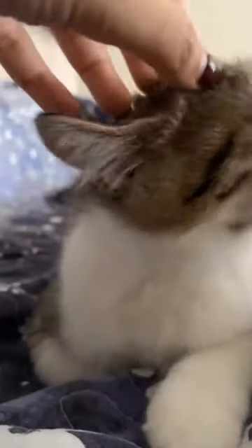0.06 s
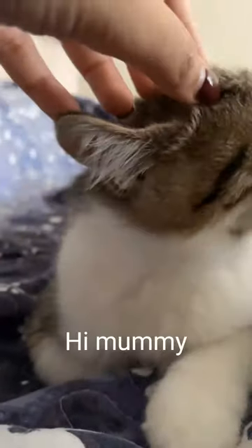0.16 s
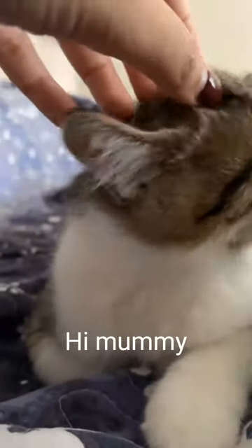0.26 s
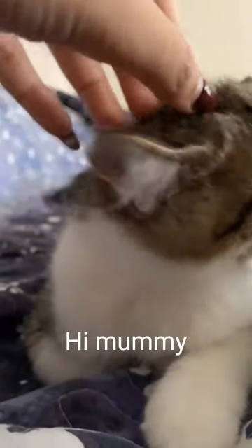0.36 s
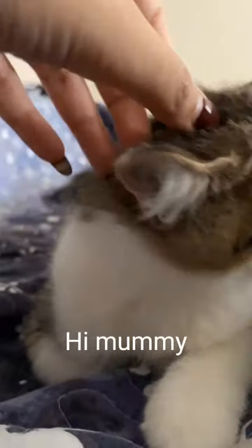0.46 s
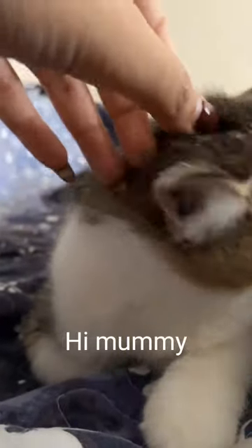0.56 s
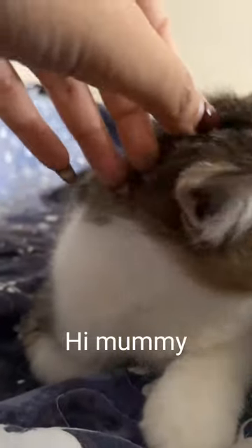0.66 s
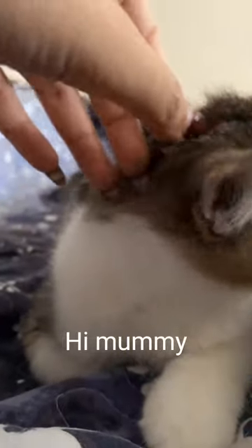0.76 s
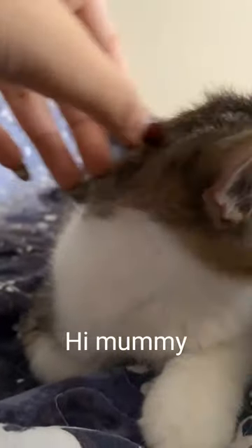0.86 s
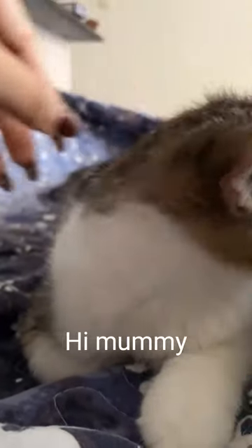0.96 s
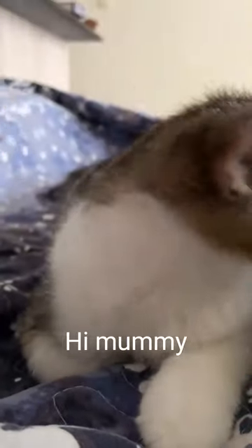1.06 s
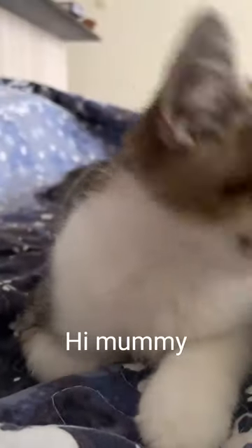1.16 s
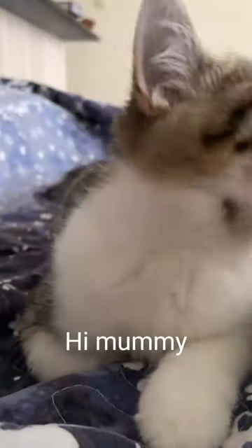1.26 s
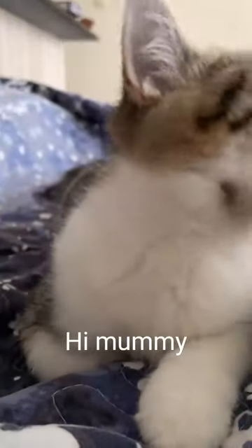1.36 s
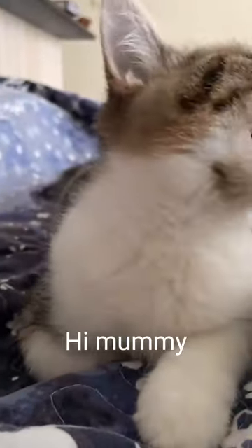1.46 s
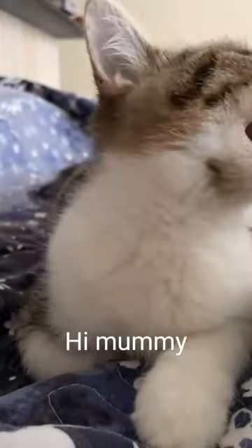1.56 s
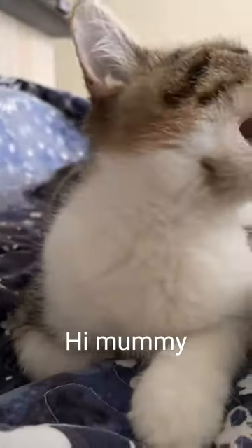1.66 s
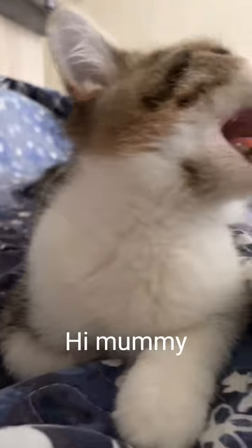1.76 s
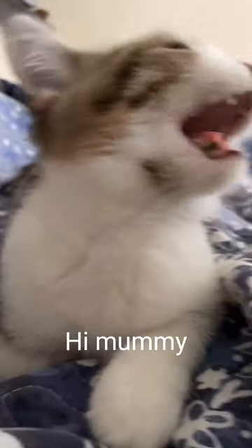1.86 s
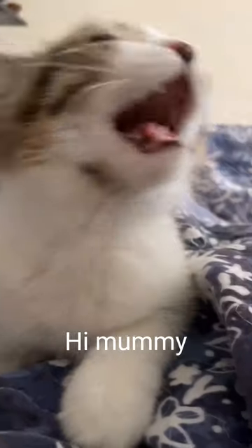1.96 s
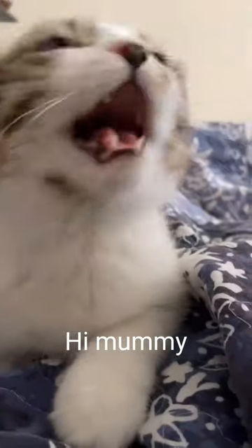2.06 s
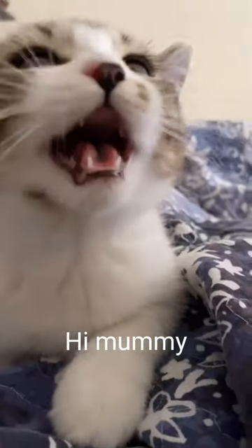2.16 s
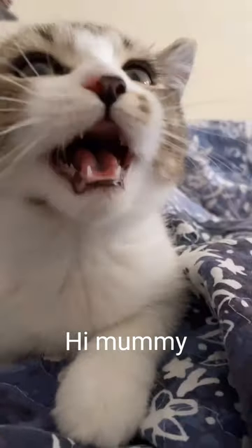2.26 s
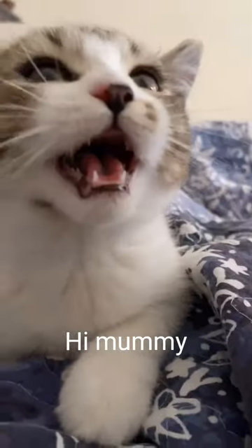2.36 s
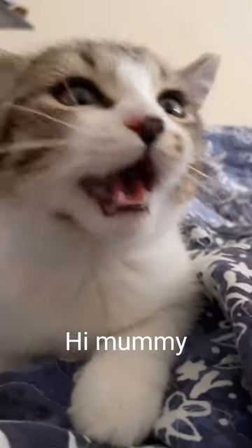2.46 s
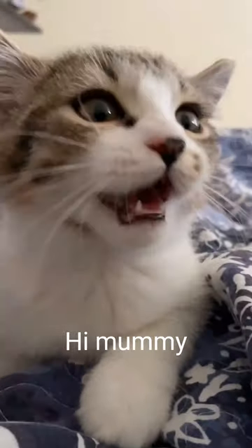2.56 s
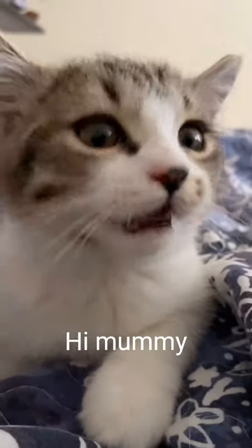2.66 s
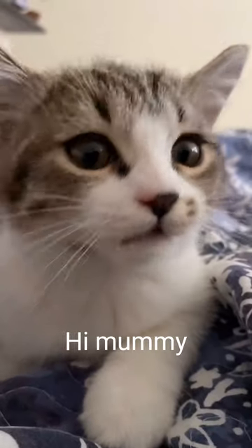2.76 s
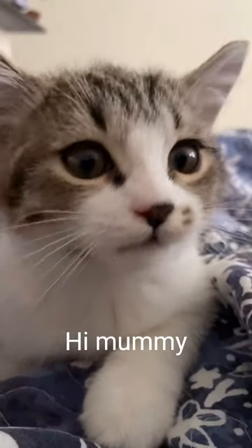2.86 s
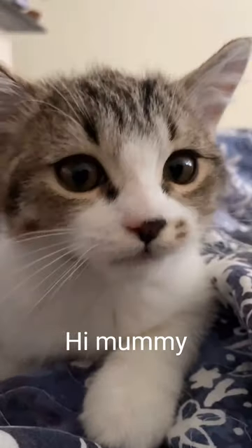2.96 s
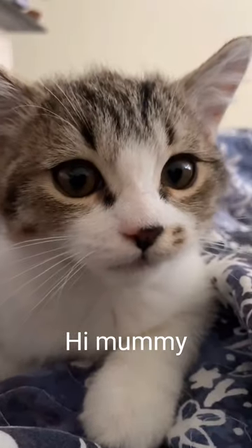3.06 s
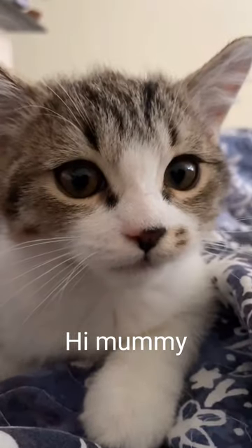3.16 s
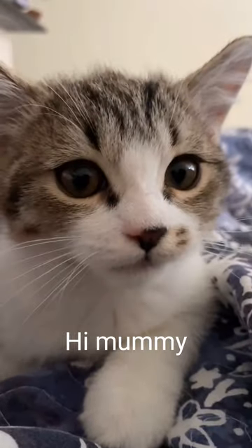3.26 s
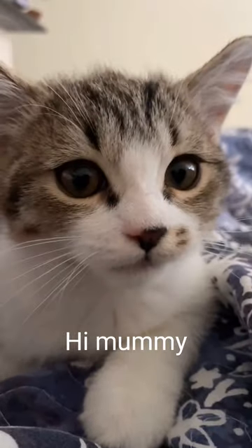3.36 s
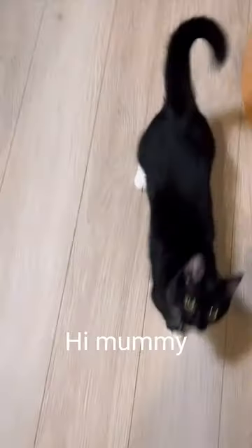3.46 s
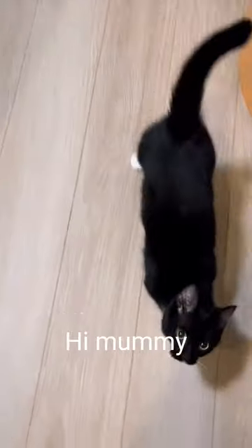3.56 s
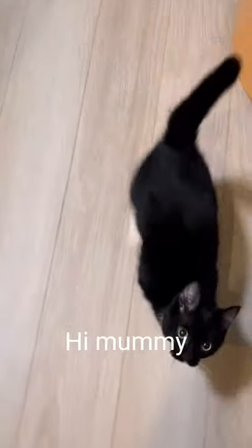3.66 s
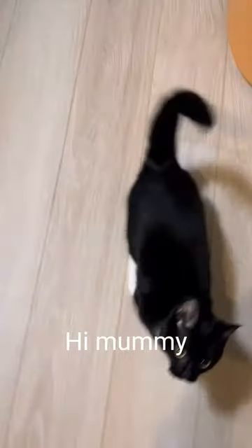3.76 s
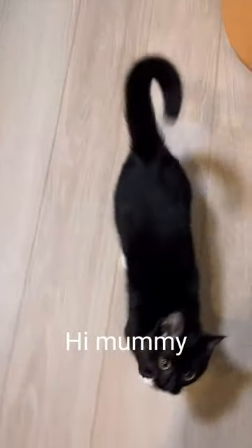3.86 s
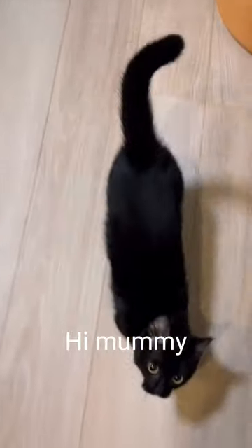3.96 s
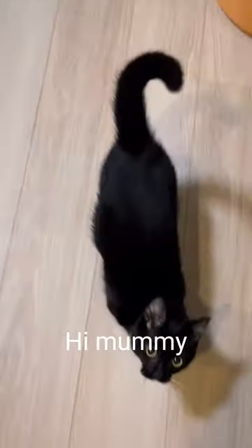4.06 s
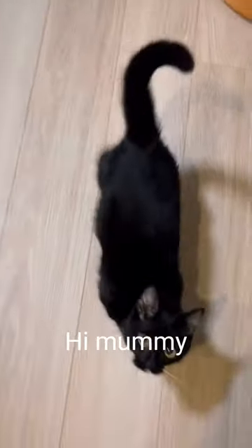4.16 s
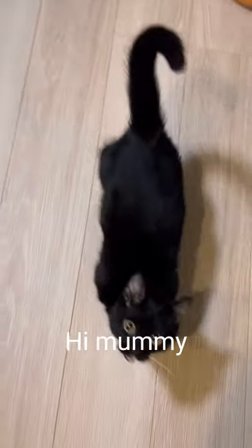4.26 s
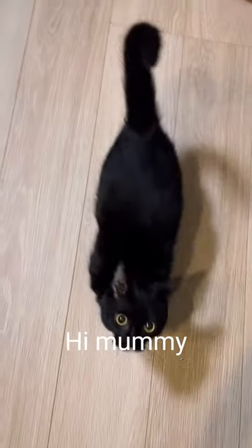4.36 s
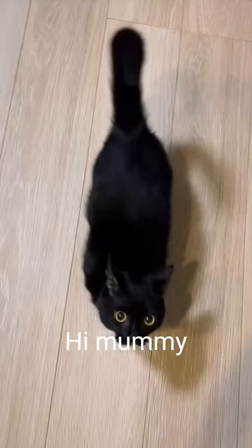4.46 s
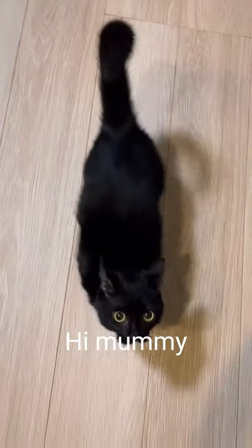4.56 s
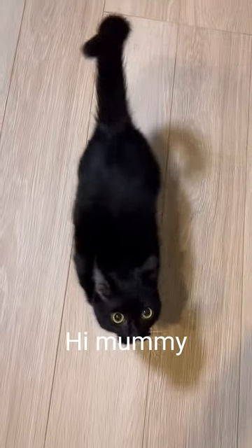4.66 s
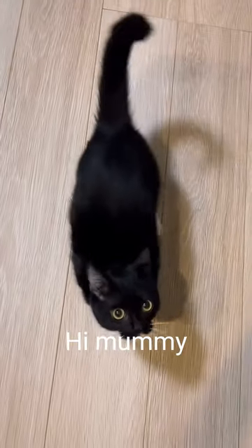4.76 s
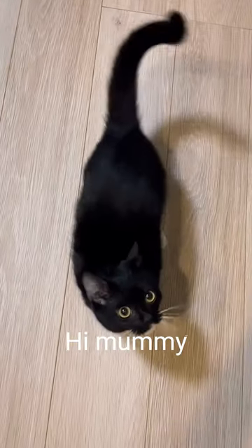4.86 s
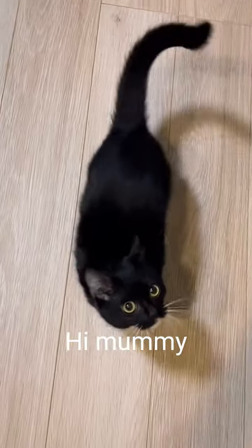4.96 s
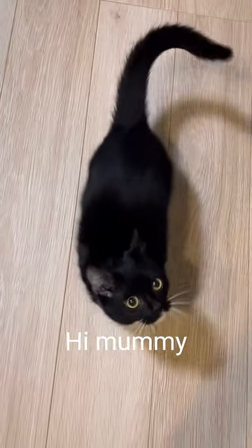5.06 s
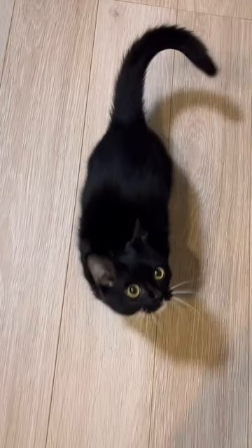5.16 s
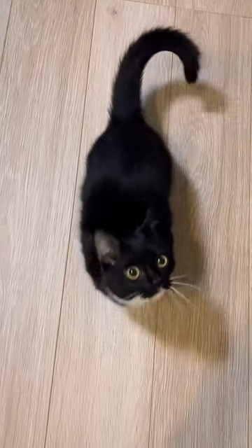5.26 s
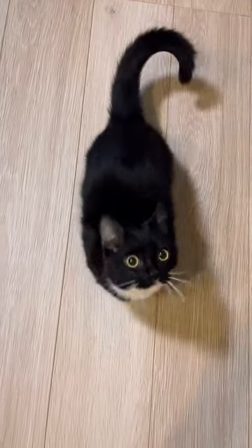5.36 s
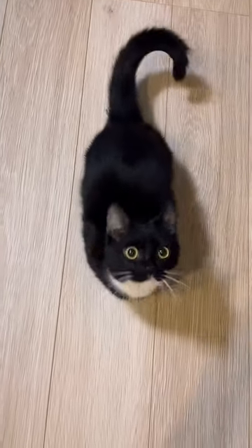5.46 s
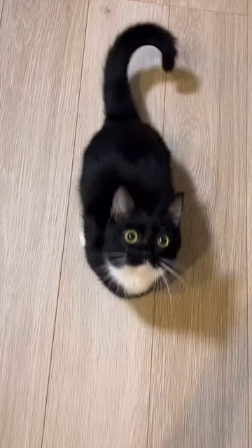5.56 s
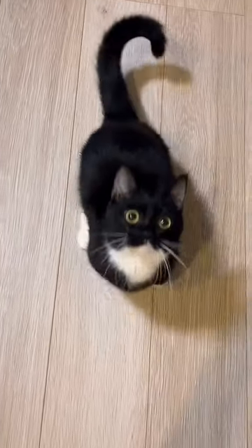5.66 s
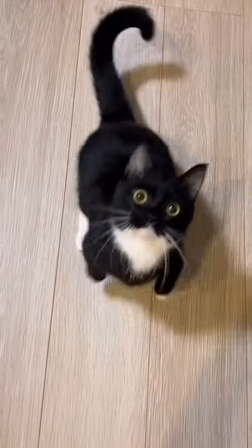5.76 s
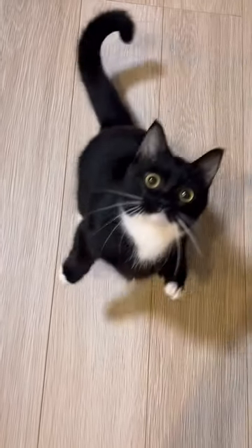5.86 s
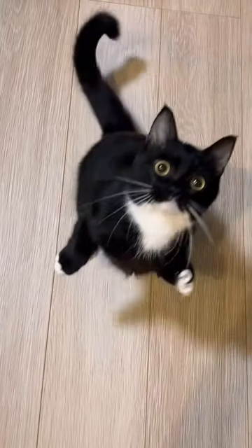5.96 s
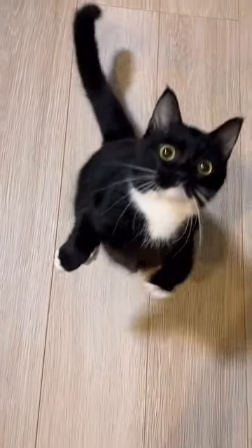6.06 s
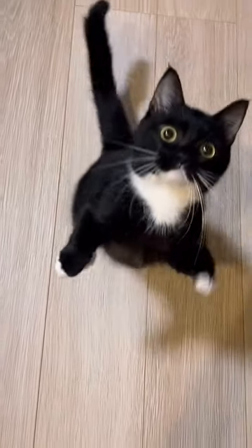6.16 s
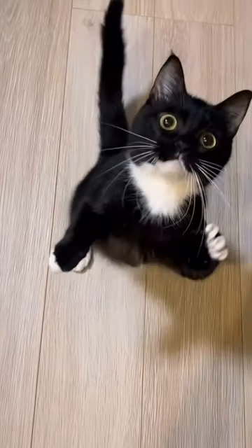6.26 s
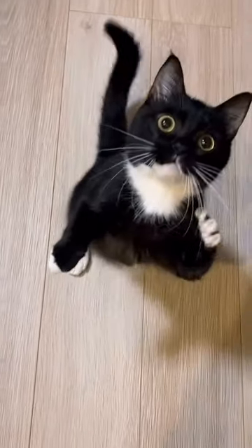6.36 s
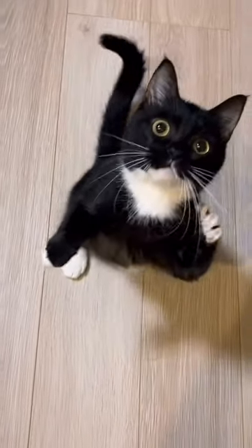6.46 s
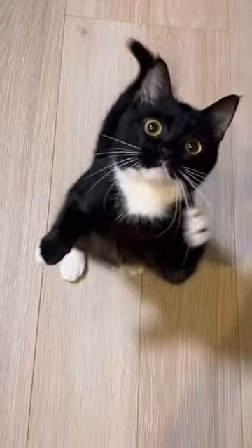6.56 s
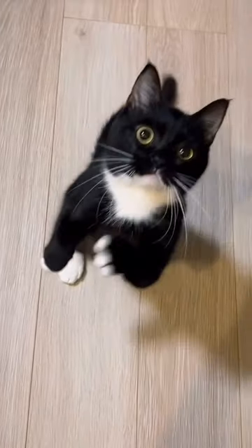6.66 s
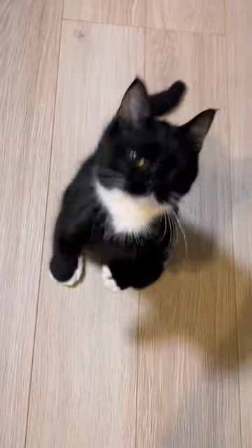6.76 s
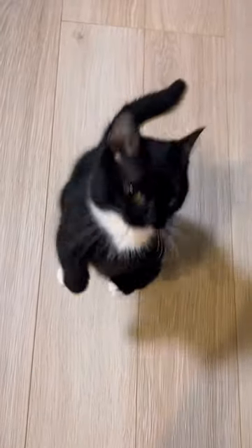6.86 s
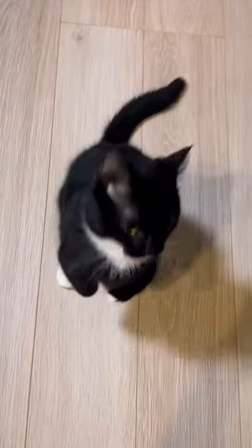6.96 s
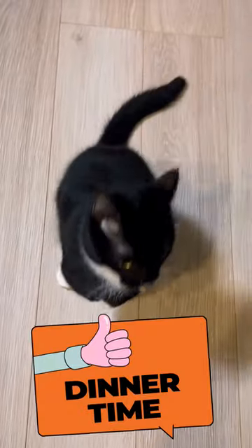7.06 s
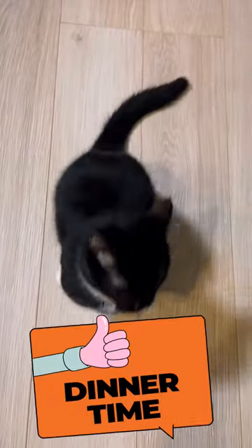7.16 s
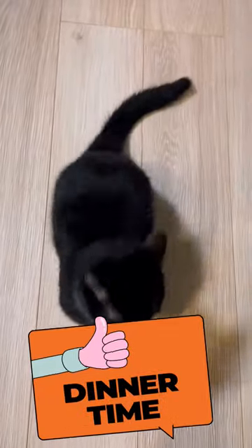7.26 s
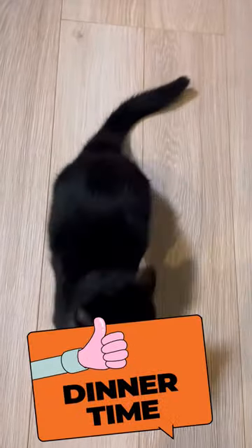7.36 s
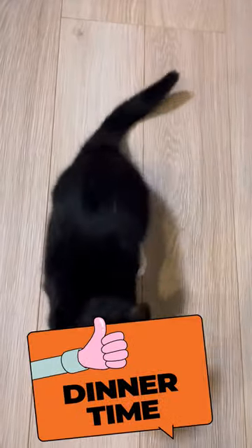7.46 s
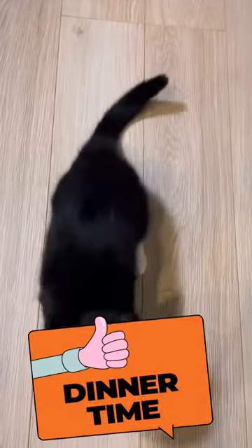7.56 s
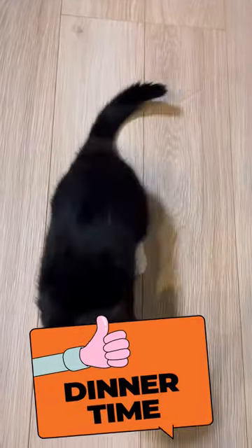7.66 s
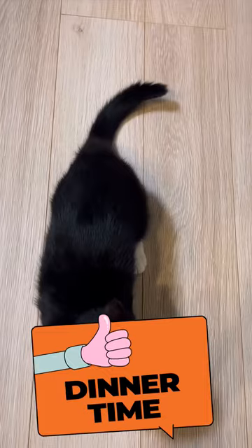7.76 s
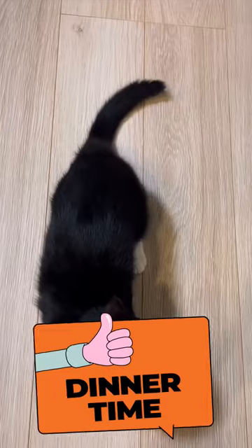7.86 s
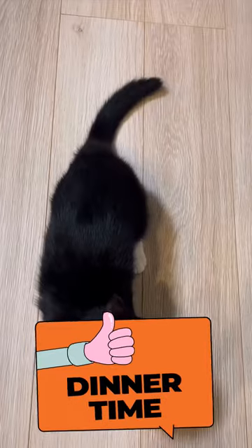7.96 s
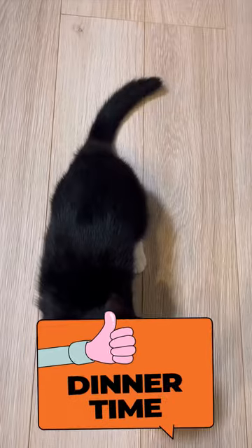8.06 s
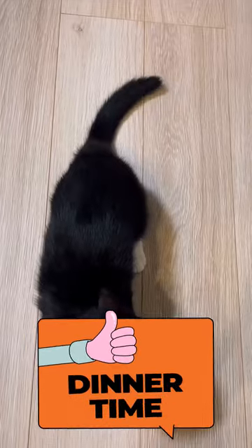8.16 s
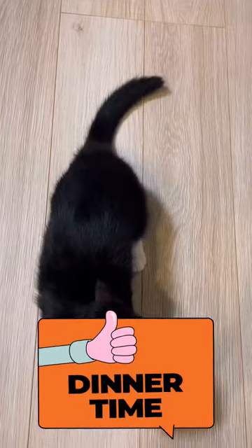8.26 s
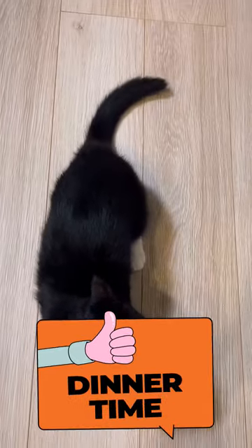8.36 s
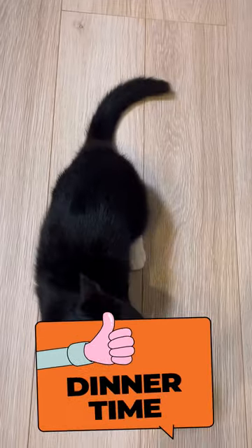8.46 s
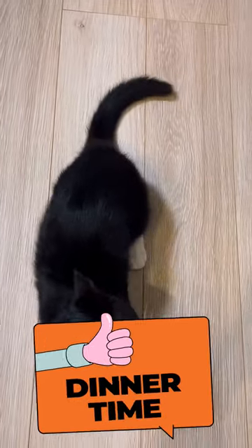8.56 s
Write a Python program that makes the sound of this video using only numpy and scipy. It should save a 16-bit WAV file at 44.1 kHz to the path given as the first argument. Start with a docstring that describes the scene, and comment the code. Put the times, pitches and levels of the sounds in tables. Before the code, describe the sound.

A kitten gives one long, loud meow close by over an appliance rumble, then a cat meows softly twice in a quieter room.

```python
"""A kitten and a cat in two homes

A kitten on a bed gives one long, loud meow close to a phone with two microphones, turning its head,
over the rumble of an appliance. After a short silence a cat on a wooden floor gives two soft meows
further off, among footfalls, cloth rustle and small ticks in a quieter room. In each meow the vocal
folds buzz, and the moving mouth boosts some of the harmonics (tones at multiples of the pitch)."""
import sys
import numpy as np
from scipy import signal
from scipy.fft import rfft, irfft
from scipy.io import wavfile
from scipy.ndimage import uniform_filter1d

SR = 44100
rng = np.random.default_rng(int(sys.argv[2]) if len(sys.argv) > 2 else 0)


def pcm_store(signal):
    """Save signal as 16-bit PCM."""
    levels = np.round(np.clip(np.atleast_2d(signal), -1, 1) * 32767)
    wavfile.write(sys.argv[1], SR, levels.astype(np.int16).T)


N = 379684
T = np.arange(N) / SR
PAIR = np.array([[1], [-1]])  # plus on the left, minus on the right
TOP_HZ = 15600

# The course of the kitten's meow: (time [s], pitch [Hz], level [dB], lower mouth resonance [Hz],
# upper mouth resonance [Hz], roughness [0-1], high throat ring [dB])
KITTEN_MEOW = [(1.205, 545, -37, 1790, 3600, .6, -67), (1.237, 664, -24.5, 1970, 3800, .42, -45),
               (1.26, 780, -20, 2410, 3900, .36, -42), (1.295, 859, -19.5, 1370, 4350, .3, -40),
               (1.335, 912, -18, 1530, 4540, .12, -56), (1.397, 948, -17.5, 1510, 4800, .03, -64),
               (1.42, 929, -18, 1504, 4440, .03, -67.5), (1.46, 912, -18.5, 1475, 4350, .035, -75),
               (1.55, 923.6, -16.5, 1508, 4260, 0.061, -55.5), (1.7, 916, -15.5, 1580, 3850, 0.034, -56.5),
               (1.85, 908, -17.5, 1680, 3580, 0.029, -62), (1.95, 896, -17, 1633, 3640, 0.045, -43.5),
               (2.1, 875.6, -16, 1770, 3720, 0.032, -38), (2.25, 865.3, -18, 1717, 3800, 0.025, -35),
               (2.46, 847.6, -18, 1603, 3556, 0.047, -35), (2.53, 825, -20, 1554, 3770, .1, -38),
               (2.555, 819, -20, 1457, 3760, 0.13, -40.5), (2.564, 689, -32, 1348, 2300, 1, -34),
               (2.576, 605, -25.5, 805, 2200, 0.7, -31.5), (2.592, 600, -25.5, 900, 2200, 0.7, -60)]
# How far the kitten's sound at the left microphone runs ahead: (frequency [Hz], lead [rad])
LEFT_LEAD = [(5000, 0.21), (6300, 2.2), (9000, 4.46), (11000, 4.9), (13000, 10), (15500, 11.2)]
# The shape of the kitten's mouth and throat; voice() names each number
KITTEN_SHAPE = dict(mouth=(-8.5, -11, 400.5, 398.5, -2.5, 1.5), throat=(2730, 620, 0.42),
                    late_db=18.5, fade=(1.6, .13, -12))


def kitten():
    """One long meow; as the head turns, each low harmonic shifts between the microphones."""
    # Head turn: (time [s], pose [0 turned away, 1 facing the phone, 2 turned past it])
    head_turn = [(1.2, 0.029), (1.75, 0.57), (1.9, 0.62), (2.03, 0.91), (2.25, 1.31), (2.46, 1.6),
                 (2.6, 1.58)]
    # Left level minus right, a row for each of harmonics 1-5: (pose 0 [dB], pose 1 [dB], pose 2 [dB])
    balance = [(14, -2, 6.5), (-3.5, 9, 4.5), (20.5, -10.5, 4.5), (3.5, -1.5, -1), (0.5, -2.5, 0)]
    # Lead of the left side, same rows: (pose 0 [rad], pose 1 [rad], pose 2 [rad])
    leads = [(-1.4, -1.04, 2.5), (2.5, -1.4, 0.83), (4.5, 3.5, 4.9), (0.64, 1.77, 3.42), (0.2, 1, 3.2)]
    # High harmonics: (frequency [Hz], level against the first three together [dB])
    treble = [(4000, -27.5), (5500, -52.5), (6400, -45.5), (7300, -33), (8500, -35.5), (10500, -47.5),
              (12500, -48.5), (15500, -44)]

    def top_gain(hz, db, t):
        *_, upper_hz, rough, ring_db = columns(KITTEN_MEOW, t)
        mouth = undb(db[4] - 4.5) * resonance(hz, upper_hz + 500, width_hz=1900)
        ring = undb(ring_db) * resonance(hz, centre_hz=8870, width_hz=960)
        buzz = sum(undb(db[:3])) * undb(columns(treble, hz)[0])
        return (1 - rough) * (mouth + ring + buzz)  # a rough voice loses its high harmonics

    def paths(k, hz, t):
        if k > 5:
            return 0, columns(LEFT_LEAD, hz)[0]
        pose = columns(head_turn, t)[0]
        # puffs of air rock the lowest harmonic from side to side
        rocking_db = (k == 1) * 7 * np.clip((puffs_db(t) + 64) / 12, 0, 1) * wander(90, len(t))
        pan_db = np.interp(pose, range(3), balance[k - 1]) + rocking_db
        return pan_db, np.interp(pose, range(3), leads[k - 1])

    return meow(KITTEN_MEOW, KITTEN_SHAPE, top_gain, paths, jitter=.0018, flicker_db=3, rasp_db=-40,
                flutter_db=lambda k, rough: min(.5 * (k - 1), 2.2))


def kitten_breath():
    """Air rushes past the vocal folds, grows where the voice is rough and rings in the throat."""
    # Tone of the rushing air and of the throat ring: (frequency [Hz], level [dB])
    rushing = [(300, -4.5), (600, -9.5), (1300, -18), (2300, 8), (3200, -27.5), (4500, -4), (7000, -16.5),
               (15500, -24)]
    ringing = [(6000, -32.5), (8000, 2), (9000, -1.5), (10500, -16), (14000, -9), (15500, -10.5)]

    def stereo_noise(tone):
        spectrum, hz = noise_spectrum(tone)
        return irfft(spectrum * np.exp(.5j * PAIR * columns(LEFT_LEAD, hz)[0]), N)

    start, end = KITTEN_MEOW[0][0], KITTEN_MEOW[-1][0]
    _, rough, db = voice(KITTEN_MEOW, np.maximum(T, start), **KITTEN_SHAPE)
    envelope = np.clip((T - start) / 0.013, 0, 1) * np.exp(-np.maximum(T - end, 0) / 0.018)
    effort = sum(undb(db[:3])) * (undb(-39.5) + undb(-7.5) * rough ** 2)
    ring_gain = undb(columns(KITTEN_MEOW, T)[5] - 21.5)
    air = effort * stereo_noise(rushing) + ring_gain * stereo_noise(ringing)
    return envelope * undb(3 * wander(40)) * air


def kitten_pops():
    """The meow breaks off in lone pops of the vocal folds, which ring the closing mouth."""
    # Pops: (time [s], level [dB], upper resonance against the lower [dB])
    pops = [(2.579, -17, -7), (2.593, -24, -14)]
    low_hz, high_hz, rise_s, decay_s = 620, 1260, 0.0029, 0.0053
    out, t = np.zeros((2, N)), T[:SR // 20]
    envelope = 2 * (1 - np.exp(-t / rise_s)) * np.exp(-t / decay_s)
    for time, db, upper_db in pops:
        start = int(time * SR)
        ring = np.sin(2 * np.pi * low_hz * t) + undb(upper_db) * np.sin(2 * np.pi * high_hz * t)
        out[:, start:start + len(t)] += undb(db + PAIR) * ring * envelope
    return out


def cat():
    """Two soft meows; floor and walls return a short echo, different at each microphone."""
    # One list a meow: (time [s], pitch [Hz], level [dB], lower mouth resonance [Hz],
    # upper mouth resonance [Hz], roughness [0-1])
    calls = [
        [(3.88, 408.8, -63, 900, 1300, 0.45), (4, 413.2, -53.5, 556, 1440, 0.41),
         (4.05, 507, -57, 696, 1600, 0.34), (4.12, 598, -63.5, 1340, 2250, .3),
         (4.16, 640, -50.5, 1650, 2730, 0.36), (4.2, 676.6, -41.5, 1800, 3030, 0.19),
         (4.235, 711, -41.5, 1940, 3260, 0.087), (4.27, 708, -38.5, 1870, 3200, 0.14),
         (4.31, 687, -45, 1910, 2680, 0.085), (4.35, 659, -49.5, 1600, 1980, 0.21),
         (4.41, 584, -53.5, 1400, 1880, 0.34)],
        [(6.07, 520, -49, 422, 420, 0.17), (6.13, 632, -61, 620, 620, 0.28), (6.17, 780, -59, 1540, 1550, 0.21),
         (6.21, 721, -66, 1460, 1620, 0.21), (6.27, 698, -58, 1620, 2730, 0.077),
         (6.32, 704.4, -50, 1410, 2760, 0.057), (6.38, 708.7, -49, 1420, 2720, 0.049),
         (6.46, 688, -50.5, 1400, 2280, 0.072), (6.52, 682, -58, 1616, 2040, .12),
         (6.61, 669, -71, 1400, 1700, 0.35)],
    ]
    # High rings of the voice: (frequency [Hz], width [Hz], base level against harmonic 2 [dB])
    rings = [(4737, 250, -6), (6350, 880, -30.5)]
    shape = dict(mouth=(0, -38, 918, 795, -9.5, 2), throat=(650, 370, -22),
                 late_db=0, fade=(6.4, .6, -14))

    def top_gain(hz, db, t):
        second_meow = t[0] > calls[0][-1][0]
        weak_db = np.minimum(db[1] + 57, 0)  # the rings need full voice and an open mouth
        dip_db = -10 * (np.abs(t - calls[1][1][0]) < .1)  # early in the second meow
        level_db = db[1] + weak_db + dip_db + (-6 if second_meow else -5)
        return sum(undb(level_db + ring_db) * resonance(hz, centre, width) ** 2
                   for centre, width, ring_db in rings)

    def paths(k, hz, t):
        return .5, hz / 4000

    direct = sum(meow(call, shape, top_gain, paths, jitter=0.004, flicker_db=6.5, rasp_db=-29,
                      flutter_db=lambda k, rough: 1.5 + 6 * rough) for call in calls)
    t = T[:SR // 4]
    echo = rng.standard_normal((2, len(t))) * np.exp(-t / 0.038) * (t > .005)
    return direct + undb(-34) * signal.fftconvolve(direct, echo, axes=1)[:, :N]


def meow(call, shape, top_gain, paths, jitter, flicker_db, rasp_db, flutter_db):
    """Vocal folds buzz on a gliding pitch; each harmonic takes its own path to the microphones."""
    start, end = int(call[0][0] * SR), int(call[-1][0] * SR)
    t, n = T[start:end], end - start
    pitch, rough, db = voice(call, t, **shape)
    wobble = jitter * wander(90, n) + .002 * wander(30, n) + 0.036 * rough ** 2 * wander(400, n)
    phase = 2 * np.pi * np.cumsum(pitch * (1 + wobble)) / SR
    out = np.zeros((2, N))
    for k in range(1, 19):
        hz = k * pitch
        if k <= 5:
            gain = undb(db[k - 1] + 0.35 * k * wander(35, n))
        else:
            gain = top_gain(hz, db, t) * undb(flicker_db * wander(15, n))
        # uneven cycles shake the higher harmonics more
        shake = 1 - rough ** 2 + rough * wander(800, n) + k * undb(rasp_db) * wander(500, n)
        gain = gain * shake * undb(flutter_db(k, rough) * wander(110, n))
        pan_db, lead = paths(k, hz, t)
        pan = undb(pan_db) * np.ones(n)
        sides = np.array([pan, np.ones(n)]) * 2 / np.sqrt(1 + pan ** 2)
        # all harmonics dip together once a cycle as the folds snap shut
        out[:, start:end] -= gain * sides * np.cos(k * phase + PAIR * lead / 2) * (hz < TOP_HZ)
    out[:, start:end] *= np.clip(np.minimum(t - t[0], (t[-1] - t) / 3) / 0.0044, 0, 1)
    return out


def voice(call, t, mouth, throat, late_db, fade):
    """Pitch, roughness and levels of harmonics 1-5, shaped by a moving mouth and a steady throat."""
    slope_db_per_octave, floor_db, low_width_hz, high_width_hz, high_db, steepness = mouth
    throat_hz, throat_width_hz, throat_db = throat
    fade_time, fade_s, fade_db = fade
    pitch, level_db, low_hz, high_hz, rough = columns(call, t)[:5]
    pitch = uniform_filter1d(pitch, size=SR // 110)  # the folds round every turn of the pitch
    hz = np.arange(1, 6)[:, None] * pitch
    # the lowest harmonic and the throat resonance start late_db and half that weaker, then catch up
    weak_db = late_db * np.clip(1 - (t - call[0][0]) / 0.096, 0, 1) ** .5
    boost = (undb(floor_db) + resonance(hz, low_hz, low_width_hz) ** steepness
             + undb(high_db) * resonance(hz, high_hz, high_width_hz) ** steepness
             + undb(throat_db - weak_db / 2) * resonance(hz, throat_hz, throat_width_hz))
    db = level_db + slope_db_per_octave * np.log2(hz / 1000) + 20 * np.log10(boost)
    db[0] -= weak_db
    db[4] += fade_db * np.exp(-.5 * (2 * (t - fade_time) / fade_s) ** 2)  # harmonic 5 fades for a while
    return pitch, np.clip(rough, 0, 1), db


def thumps():
    """Low knocks travel through hand and floor and die away quickly."""
    # Knocks: (time [s], level [dB], frequency [Hz])
    knocks = [(1.024, -16, 80), (1.175, -23.5, 79), (1.211, -22, 64), (2.727, -21, 60), (2.848, -19, 57.6),
              (3.455, -31.5, 170.7), (3.682, -32.5, 99), (3.747, -23, 97), (3.873, -34.5, 155),
              (4.041, -34, 109), (4.114, -41.5, 112)]
    out, t = np.zeros(N), T[:SR // 4]
    envelope = 0.97 * (1 - np.exp(-t / 0.00096)) * np.exp(-t / 0.024)
    for time, db, hz in knocks:
        start = int(time * SR)
        out[start:start + len(t)] += undb(db) * np.sin(2 * np.pi * hz * t) * envelope
    return out


def ticks():
    """Claws and cloth tick: a snap of noise and a brief ring, with a short room echo."""
    # Ticks: (time [s], level [dB], frequency [Hz])
    touches = [(2.656, -40, 2120), (2.696, -34.5, 1820), (2.821, -37, 1370), (3.108, -40.5, 1000),
               (3.23, -41, 804), (3.7427, -41, 13960), (4.7413, -46, 4350), (4.745, -46, 13000),
               (4.749, -47, 4340), (6.6363, -57, 2600), (7.315, -56, 1700)]
    out, t = np.zeros((2, N)), T[:SR // 10]
    for time, db, hz in touches:
        start = int(time * SR)
        snap = rng.standard_normal(len(t)) * (np.exp(-t / 0.0024) + 0.08 * np.exp(-t / 0.026))
        band = signal.butter(2, [hz / 2.2, min(hz * 1.7, 18000)], "bandpass", fs=SR, output="sos")
        snap = signal.sosfilt(band, snap)
        ring = np.sin(2 * np.pi * hz * t) * np.exp(-t / 0.0036) * np.minimum(t * hz / 2, 1)
        tick = snap / np.abs(snap).max() + 0.8 * ring
        out[:, start:start + len(t)] += undb(db + PAIR) * tick / np.abs(tick).max()
    return out


def rustle():
    """Moving cloth makes a grainy hiss, partly alike at both microphones."""
    # Bursts of rustle: (peak time [s], 30 dB rise [s], hold [s], 30 dB fall [s], level [dB],
    # relative level of the highest hiss, which the phone passes or dulls [dB])
    bursts = [(3.638, .4, .005, 0.18, -64, -30), (3.741, 0.027, 0.0045, 0.3, -76, 4),
              (3.971, 0.041, 0.11, 0.18, -56.5, -3), (4.242, 0.13, 0.0054, 0.17, -57, -1),
              (4.741, 0.017, 0.01, 0.16, -58, -6), (7.263, .5, 0.059, .2, -93, 8)]
    # Tone of the main hiss and of the highest hiss: (frequency [Hz], level [dB])
    main_tone = [(700, -23), (1800, 3.5), (4000, 4.5), (9000, 3.5), (9300, -53)]
    top_tone = [(9200, -47), (9600, -2.5), (13000, 3.5), (15500, -6.5)]
    main_gain = top_gain = out = 0
    for time, rise, hold, fall, db, top_db in bursts:
        drop_db = 30 * np.maximum(np.maximum((time - T) / rise, (T - time - hold) / fall), 0)
        main_gain += undb(db - drop_db)
        top_gain += undb(db - drop_db + top_db)
    for tone, gain in ((main_tone, main_gain), (top_tone, top_gain)):
        out += gain * (noise(tone) + 0.66 * PAIR * noise(tone))
    return out * undb(1.55 * wander(150))


def air_puffs():
    """The kitten's air hits the microphones: dull, lumpy noise, mostly opposite at the two."""
    # Tone of the puffs: (frequency [Hz], level [dB])
    tone = [(60, -11), (330, -1), (550, 12), (900, -15.5), (2300, -14.5), (3500, -30)]
    air = .15 * noise(tone) + PAIR * noise(tone)
    return undb(puffs_db(T) + 4 * wander(60)) * air


def puffs_db(t):
    """Level of the kitten's puffs of air, each swelling and fading smoothly."""
    # Puffs: (peak time [s], length [s], level [dB])
    puffs = [(1.668, 0.081, -44), (1.744, 0.073, -41.5), (1.865, 0.1, -39.5), (1.92, 0.19, -38.5),
             (2.198, 0.54, -53)]
    gain = sum(undb(db) * np.exp(-.5 * (3 * (t - time) / length) ** 2) for time, length, db in puffs)
    return 20 * np.log10(gain + 1e-6)


def kitten_room():
    """An appliance rumbles and hums; the room noise sinks under the meow and comes back after it."""
    # Tone of the noise both microphones share: (frequency [Hz], level [dB])
    shared = [(15, -45), (25, -6.5), (62, -0.5), (148, -11), (389, -20.5), (600, -24.5), (850, -27),
              (1000, -38.5), (1300, -34.5), (2850, -36.5), (5880, -47.5), (6730, -51.5), (7300, -90),
              (9300, -51), (15500, -67.5)]
    # Tone of the noise that is opposite at the two: (frequency [Hz], level [dB])
    opposite = [(15, -52.5), (25, -23.5), (86, -4), (227, -5), (895, -1.5), (2920, -13.5), (5280, -27.5),
                (6730, -22.5), (15500, -42.5)]
    # Rows for rumble, low middle and hiss: (change under the meow [dB], change after it [dB])
    changes = [(-2, 4), (-6, 3.5), (-18, 0)]
    # The bass spreads wide, then narrows to the middle: (time [s], change of the opposite bass [dB])
    bass_width = [(0, -3), (.85, -1.5), (1.05, 9), (2.0, 10.5), (2.4, -30)]
    # Motor tones: (frequency [Hz], level [dB])
    motor = [(58, -36), (349, -54), (437, -55.5)]
    sunk = np.interp(T, (1.3, 1.7, 2.3, 2.62), [0, 1, 1, 0])
    after = np.interp(T, (2.3, 2.62), [0, 1])
    swells_db = [under_db * sunk + after_db * after for under_db, after_db in changes]
    rumble = room_noise(shared, opposite, shared_db=-36, opposite_db=-49, flicker_db=1,
                        swells_db=swells_db, wide_bass_db=columns(bass_width, T)[0])
    return rumble + hum(motor, waver_db=2.8, rate_hz=.7)


def cat_room():
    """A quieter room: low noise, a little louder on the right, and two faint tones."""
    # Tone of the noise both microphones share: (frequency [Hz], level [dB])
    shared = [(25, -6), (59, 2.5), (107, -1.5), (233, -8.5), (567, -20.5), (703, -16.5), (1200, -27),
              (2900, -40), (4700, -54.5), (9300, -58.5), (15500, -60)]
    # Tone of the noise that is opposite at the two: (frequency [Hz], level [dB])
    opposite = [(15, -47), (25, -13), (240, -4.5), (469, -13), (703, 0.5), (762, -5.5), (4380, -41),
                (15500, -57)]
    # Faint tones: (frequency [Hz], level [dB])
    tones = [(721.4, -75), (1206, -80)]
    rumble = room_noise(shared, opposite, shared_db=-50, opposite_db=-59, flicker_db=0.9)
    return rumble * undb(-PAIR) + hum(tones, waver_db=7.1, rate_hz=3.03)


def room_noise(shared, opposite, shared_db, opposite_db, flicker_db, swells_db=(0, 0, 0), wide_bass_db=0):
    """Background noise in octave bands that each flicker on their own."""
    mid, hz = noise_spectrum(shared)
    side, _ = noise_spectrum(opposite)
    out = 0
    for low_hz in 20 * 2. ** np.arange(10):
        octave = (hz >= low_hz) & (hz < 2 * low_hz)
        centre = undb(shared_db) * irfft(mid * octave, N)
        width = undb(opposite_db + (low_hz < 300) * wide_bass_db) * irfft(side * octave, N)
        swell_db = swells_db[0 if low_hz < 150 else 1 if low_hz < 600 else 2]
        out += (centre + PAIR * width) * undb(swell_db + flicker_db * wander(9))
    return out


def hum(tones, waver_db, rate_hz):
    """Tones of steady pitch that waver in level."""
    return sum(undb(db + waver_db * wander(rate_hz)) * np.sin(2 * np.pi * hz * T) for hz, db in tones)


def noise_spectrum(tone):
    """Spectrum and frequencies of noise with the given tone and a strength (rms) of 1."""
    hz = np.arange(N // 2 + 1) * SR / N + 1e-3
    tone_hz, tone_db = np.transpose(tone)
    spectrum = rfft(rng.standard_normal(N)) * undb(np.interp(np.log(hz), np.log(tone_hz), tone_db))
    return spectrum / np.sqrt(np.mean(irfft(spectrum, N) ** 2)), hz


def noise(tone):
    """Noise with the given tone, as sound."""
    return irfft(noise_spectrum(tone)[0], N)


def resonance(hz, centre_hz, width_hz):
    """How strongly a resonance passes each frequency: 1 at its centre."""
    return 1 / (1 + (2 * (hz - centre_hz) / width_hz) ** 2)


def wander(rate_hz, size=N):
    """A smooth random wobble, roughly 1 either way."""
    hold = max(int(SR / rate_hz), 1)
    steps = np.repeat(rng.standard_normal(size // hold + 1), hold)
    return 1.25 * uniform_filter1d(uniform_filter1d(steps, hold), hold)[:size]


def columns(table, at):
    """Look up values in a table by its first column, joining the rows with straight lines."""
    first, *rest = np.transpose(table)
    return [np.interp(at, first, column) for column in rest]


def undb(db):
    """Turn decibels into a gain."""
    return 10 ** (np.asarray(db) / 20)


def scene():
    """The first home fades out and the second fades in, behind the meows and small noises."""
    first_home = np.interp(T, (3.258, 3.276), [1, 0]) * (kitten_room() + air_puffs())
    second_home = np.interp(T, (3.422, 3.458), [0, 1]) * (cat_room() + rustle())
    voices = kitten_breath() + kitten() + kitten_pops() + cat()
    return first_home + second_home + voices + thumps() + ticks()


def record(dry):
    """The phone cuts the deepest bass and the highest treble."""
    bass_cut = signal.sosfilt(signal.butter(2, 38, "highpass", fs=SR, output="sos"), dry)
    return signal.sosfilt(signal.ellip(10, .2, 70, TOP_HZ, fs=SR, output="sos"), bass_cut)


dry = scene()
out = record(dry)
pcm_store(out)
```